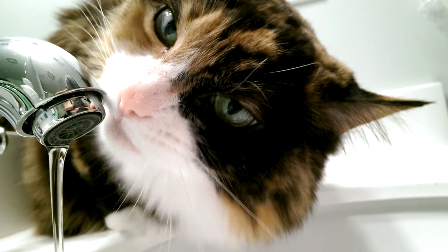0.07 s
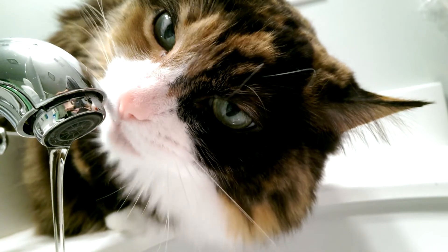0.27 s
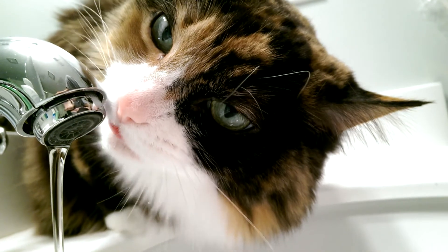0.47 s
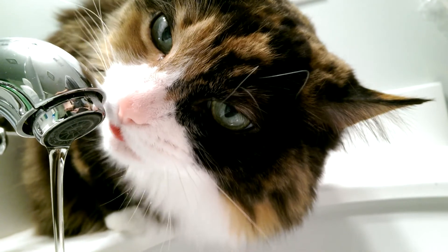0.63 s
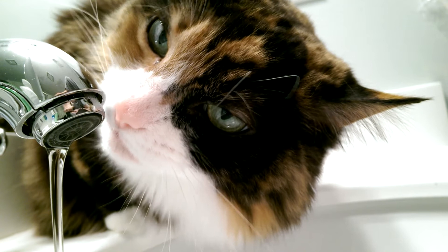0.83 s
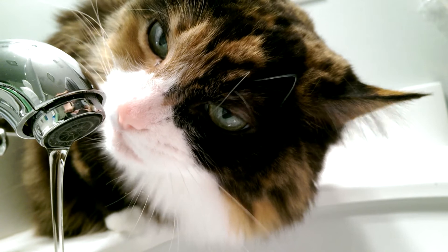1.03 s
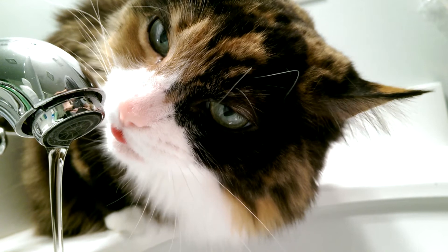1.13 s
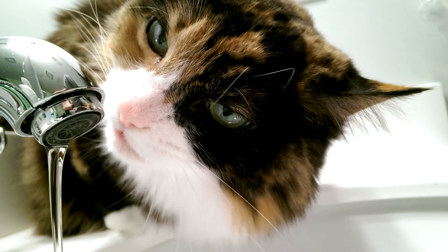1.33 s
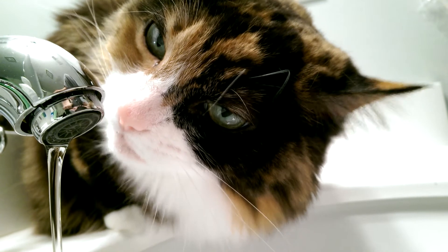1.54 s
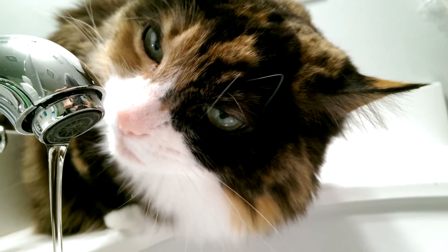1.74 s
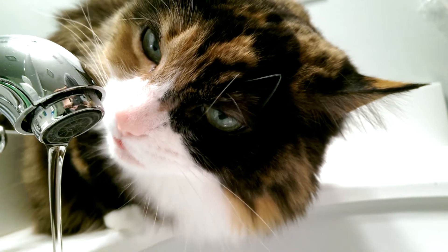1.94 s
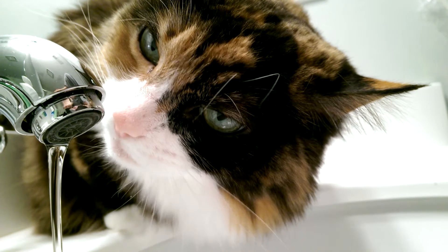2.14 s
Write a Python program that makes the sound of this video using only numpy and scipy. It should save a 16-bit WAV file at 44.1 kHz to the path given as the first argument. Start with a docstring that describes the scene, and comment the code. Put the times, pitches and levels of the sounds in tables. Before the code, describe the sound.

Close, wet lapping of a cat drinking from a softly running bathroom tap.

```python
"""Cat lapping at a bathroom tap

A cat laps a thin stream close to the microphones, four licks a second. Each lick is a wet crackle
of tearing water films that rings in the mouth; tongue clicks, gulps and bubbles fall between.
The stream patters softly in the basin over a low hollow drone. The tiled room adds a short tail."""
import sys
import numpy as np
from scipy import signal
from scipy.fft import rfft, irfft
from scipy.io import wavfile
from scipy.ndimage import uniform_filter1d, map_coordinates

SR = 44100
rng = np.random.default_rng(int(sys.argv[2]) if len(sys.argv) > 2 else 0)


def persist_wave(psi):
    """Save psi, clipped to +-1, as 16-bit WAV."""
    counts = np.round(np.clip(psi, -1, 1) * 32767).astype(np.int16)
    wavfile.write(sys.argv[1], SR, np.atleast_2d(counts).T)


N = 97020

# Treble shading of the left microphone. Each row: frequency in Hz, gain in dB.
LEFT_SHADE = [(200, -2), (1000, -1), (2000, -9.5), (3400, -8.5), (4350, -0.5), (5100, -11), (7000, -16.5),
              (15000, -13)]


def licks():
    """Water films tear on the tongue: crackle and froth swell, ring in the closing mouth, then pop."""
    # Each row: crest in seconds, lead-in in seconds, hold in seconds, level in dB, mouth ring in Hz,
    # relative fizz in dB, relative pop in dB.
    strokes = [(.256, 0.017, 0.0053, -38, 5130, 0, -3), (.5, 0.021, .022, -38, 4360, -14.5, 4),
               (0.732, 0.018, 0.012, -41, 4200, -12, 6), (0.78, .012, 0.0022, -48, 4000, -3, -8),
               (0.9804, .027, .001, -42.5, 4230, -3.5, 4.5), (1.2172, 0.019, 0.00079, -43, 4530, -7, 4.5),
               (1.445, 0.0082, 0.0012, -43, 4500, -22, 5.5), (1.684, 0.011, 0.004, -47, 4480, -9.5, 2.5),
               (1.9477, 0.016, .001, -47, 4480, -2.5, 10)]
    # Crackle and froth spectra. Each row: frequency in Hz, gain in dB.
    crackle_eq = [(200, -20), (1100, -18), (1900, -12.5), (2500, -8.5), (3700, 1), (4800, 6), (5900, 1.5),
                  (6800, -10.5), (15000, -18.5)]
    froth_eq = [(5000, 4), (7000, -6.5), (8700, 9.5), (10300, 6.5), (12500, 8), (15500, -8)]
    attack_s, release_s, pop_spread_s = .001, .005, .0022
    tears_per_s, ring_db = 2000, -5.5
    crackle, fizz, ring = np.zeros((3, N))
    t = np.arange(0, .08, 1 / SR)
    for crest_s, lead_s, hold_s, db, ring_hz, fizz_db, pop_db in strokes:
        start_s = crest_s - lead_s
        swell = amp(np.interp(t, [0, lead_s], [-6.5, 0]))
        release = np.exp(-np.maximum(t - lead_s - hold_s, 0) / release_s)
        envelope = swell * np.minimum(t / attack_s, 1) * release
        tears = amp(db) * burst(envelope, tears_per_s, spread_db=1.5)
        add(crackle, start_s, tears)
        foam = froth(len(t), per_s=6000, low_hz=5000, high_hz=13000, decay_cycles=2.5)
        add(fizz, start_s, amp(db + fizz_db) * envelope ** 2 * foam)
        # The mouth rings higher with the tongue out and sinks towards the pop.
        glide_hz = ring_hz * (1 + .1 * np.clip(1 - (t / lead_s) ** 2, 0, 1))
        mouth = resonate(tears, glide_hz, width_hz=1020)
        add(ring, start_s, amp(ring_db) * unit(mouth) * tears.std())
        pop = burst(np.exp(-.5 * ((t - lead_s) / pop_spread_s) ** 2), tears_per_s, spread_db=5)
        pop_ring = resonate(pop, ring_hz, width_hz=1600)
        add(ring, start_s, amp(db + pop_db) * unit(pop_ring) * pop.std())
    return colour(crackle, crackle_eq) + colour(fizz, froth_eq, keep_power=False) + ring


def squeak():
    """Air squeezed past the tongue in the longest lick; the whistle drops as the mouth opens."""
    # Whistle contour. Each row: time in seconds, pitch in Hz, level in dB.
    contour = [(0.498, 4350, -44), (0.511, 4376, -31), (0.528, 4303, -34), (.529, 3880, -39),
               (0.536, 3570, -42)]
    times_s, hz, db = np.transpose(contour)
    t = np.arange(N) / SR
    envelope = (t > times_s[0]) * (t < times_s[-1]) * amp(np.interp(t, times_s, db))
    flutter = 1 + .077 * unit(uniform_filter1d(rng.standard_normal(N), size=90))
    phase = 2 * np.pi * np.cumsum(np.interp(t, times_s, hz)) / SR
    return envelope * flutter * np.sin(phase)


def lip_smack():
    """A wet seal breaks in a few milliseconds."""
    # Smack spectrum. Each row: frequency in Hz, gain in dB.
    smack_eq = [(600, -39), (1900, -12), (3800, -8), (6800, -1), (8000, -5), (11900, -7), (12700, -13),
                (15500, -27)]
    start_s, db, rise_s, decay_s = .5991, -27.5, .002, .0015
    out, t = np.zeros(N), np.arange(0, .03, 1 / SR)
    envelope = np.minimum(t / rise_s, 1) ** .5 * np.exp(-np.maximum(t - rise_s, 0) / decay_s)
    snap = burst(envelope, per_s=11000, spread_db=-1)
    add(out, start_s, amp(db) * snap.std() * unit(colour(snap, smack_eq)))
    return out


def clicks():
    """Tongue and splashes make tiny clusters of wet ticks."""
    # Each row: start in seconds, level in dB, relative fizz in dB.
    clusters = [(0.144, -44, -8), (0.392, -50, -13), (0.412, -42, -10.5), (.441, -48, -17),
                (.474, -42, -24), (0.545, -54, 0), (0.6429, -44, -9), (0.69, -39, -19), (.759, -42.5, -1),
                (0.815, -49, 7), (0.918, -48.5, 0), (.995, -53.5, -4), (1.057, -48.5, -9),
                (1.256, -48.5, -9), (1.311, -49, -9), (1.337, -46, -11), (1.415, -42.5, -13),
                (1.484, -39.5, -9.5), (1.602, -48.5, -9), (1.616, -43, -9), (1.664, -42.5, -33),
                (1.789, -43.5, -21), (1.844, -46, -5), (1.904, -48, -24), (1.921, -45.5, -15),
                (1.989, -46, -2.5), (2.04, -47.5, -8), (2.125, -45.5, -1), (2.159, -45.5, -7.5)]
    # Body and fizz spectra. Each row: frequency in Hz, gain in dB.
    body_eq = [(300, -28.5), (1200, -13.5), (1900, -5), (2800, -7.5), (3800, -12), (5500, -4),
               (6800, -31.5), (15000, -43)]
    fizz_eq = [(2000, -48), (7000, 1), (8800, 5), (11700, 3.5), (16000, -11)]
    decay_s = .0035
    body, fizz = np.zeros((2, N))
    t = np.arange(0, .03, 1 / SR)
    for start_s, db, fizz_db in clusters:
        ticks = amp(db) * burst(np.exp(-t / decay_s), per_s=3300, spread_db=0)
        add(body, start_s, ticks)
        add(fizz, start_s, amp(fizz_db) * ticks)
    return colour(body, body_eq) + colour(fizz, fizz_eq)


def gulps():
    """Damped knocks of the mouth cavity as the jaw opens; lower throat thumps on swallowing."""
    # Each row: start in seconds, level in dB.
    jaw_knocks = [(0.5779, -44.5), (.916, -49), (1.147, -49.5), (1.382, -47.5), (1.624, -49.5)]
    # Each row: start in seconds, level in dB, pitch in Hz.
    swallows = [(.517, -53.5, 379), (0.74, -53, 328), (.863, -60, 470)]
    out = np.zeros(N)
    for start_s, db in jaw_knocks:
        add(out, start_s, ping(db, hz=994, decay_s=.00052))
    for start_s, db, hz in swallows:
        add(out, start_s, ping(db, hz, decay_s=.004))
    return out


def bubbles():
    """Each bubble rings briefly, rising a little in pitch."""
    # Each row: start in seconds, level in dB, pitch in Hz, decay in seconds.
    rings = [(.012, -37.5, 4800, 0.00045), (.113, -41.5, 2720, 0.0015), (0.134, -46, 2620, .0013),
             (.209, -41, 1980, 0.00086), (.223, -35.5, 2080, 0.00056), (0.262, -38.5, 1890, 0.00067),
             (.9528, -32, 4830, 0.00076), (1.006, -48, 1343, 0.0035), (1.394, -41.5, 5340, 0.0016),
             (1.507, -43.5, 2830, 0.0016), (1.511, -33.5, 5420, .0008), (1.536, -45, 5550, .001),
             (1.536, -38.5, 11700, 0.00028), (1.765, -33.5, 10600, 0.00014), (1.832, -41, 11500, 0.00044)]
    out = np.zeros(N)
    for start_s, db, hz, decay_s in rings:
        add(out, start_s, ping(db, hz, decay_s, rise_per_cycle=.005))
    return out


def froth(size, per_s, low_hz, high_hz, decay_cycles, count=30):
    """A swarm of tiny bubbles ringing at many pitches."""
    pitches_hz = np.geomspace(low_hz, high_hz, count) * rng.uniform(.97, 1.03, count)
    chance, strength = rng.random((2, count, size))
    hits = (chance < per_s / count / SR) * -np.log(strength)
    rings = [ping(0, hz, decay_cycles / hz) for hz in pitches_hz]
    return unit(sum(signal.oaconvolve(row, ring)[:size] for row, ring in zip(hits, rings)))


def trickle():
    """Drops patter in the basin in uneven clumps; the stream drives tiny bubbles under."""
    # Patter spectrum. Each row: frequency in Hz, gain in dB.
    basin_eq = [(300, -0.5), (900, -6.5), (1400, -5.5), (1900, 3.5), (3000, -3.5), (3800, 8.5),
                (4400, -11.5), (5500, 3.5), (6500, -6), (11700, -10), (14000, -14.5)]
    patter_db, fizz_db, clump_db = -61.5, -73, 3.5
    clumps = unit(uniform_filter1d(rng.standard_normal(N), size=500))
    drops = specks(N, per_s=2000, spread_db=1.5) * amp(clump_db * clumps)
    fizz = froth(N, per_s=170, low_hz=8300, high_hz=14100, decay_cycles=1.8)
    return amp(patter_db) * unit(colour(drops, basin_eq)) + amp(fizz_db) * fizz


def room(direct):
    """Dense reflections from tiles and basin, with a strong early cluster."""
    # Reflection spectrum. Each row: frequency in Hz, gain in dB.
    tile_eq = [(500, 7.5), (2000, 7.5), (3400, 2), (4200, -5.5), (4800, 3), (5700, 2), (6600, -4.5)]
    gap_s, early_s = .001, .0032
    hz, t, spectra = signal.stft(rng.standard_normal((2, SR // 2)), SR, nperseg=256)
    t60_s = at_hz([(2000, .16), (14000, .21)], hz)
    tail = signal.istft(spectra * amp(-60 * t / t60_s[:, None]), SR, nperseg=256)[1]
    age_s = np.arange(tail.shape[1]) / SR
    tail *= (age_s > gap_s) * (1 + 2.9 * np.exp(-age_s / early_s))
    send = np.array([colour(side, tile_eq, keep_power=False) for side in direct])
    return amp(-5.5) * signal.fftconvolve(send, tail / np.linalg.norm(tail[0]), axes=1)[:, :N]


def wash():
    """Diffuse water wash over a room rumble that both microphones share."""
    # Wash and rumble spectrum. Each row: frequency in Hz, gain in dB.
    wash_eq = [(20, 3), (80, 11), (190, 4), (350, -22.5), (520, -3), (1300, -5.5), (2000, -1.5),
               (3000, 2.5), (3800, -1.5), (5000, 0), (6500, -8.5), (11000, -11.5), (16000, -64)]
    db, shared_below_hz = -62.5, 760
    hz = np.fft.rfftfreq(N, 1 / SR)
    left, right = rfft(rng.standard_normal((2, N)))
    coherence = .92 / (1 + (hz / shared_below_hz) ** 6)
    left = coherence * right + np.sqrt(1 - coherence ** 2) * left
    left *= amp(.51 * at_hz(LEFT_SHADE, hz))
    return amp(db) * unit(irfft(np.array([left, right]) * amp(at_hz(wash_eq, hz)), N))


def drone():
    """A steady hollow drone, plus a low hum that dips briefly and later fades."""
    # Each row: centre in Hz, half-width in Hz, level in dB.
    resonances = [(76, 45, -72.5), (235.2, 13, -74.5), (272, 48, -72), (309.4, 19.7, -62)]
    hollow = sum(amp(db) * narrow_noise(hz, half_hz) for hz, half_hz, db in resonances)
    hum_db = np.interp(np.arange(N) / SR, [.3, .4, .46, 1.03, 1.15], [-67.5, -76, -63.5, -64, -78])
    hum = amp(hum_db) * narrow_noise(hz=123.7, half_width_hz=6.6)
    return (hollow + hum) * amp([[.9], [-.9]])  # slightly left


def amp(db):
    """Decibels to gain."""
    return 10 ** (np.asarray(db) / 20)


def unit(x):
    """Scale to rms 1."""
    return x / np.sqrt(np.mean(x ** 2) + 1e-20)


def at_hz(points, hz):
    """Interpolate a table on a log-frequency axis."""
    f, value = np.transpose(points)
    return np.interp(np.log(hz + 1), np.log(f), value)


def add(mix, start_s, sound):
    """Mix a sound in, in place."""
    part = mix[max(round(start_s * SR), 0):][:len(sound)]
    part += sound[:len(part)]


def colour(x, eq, keep_power=True, size=2048):
    """Minimum-phase filter with the given spectrum."""
    gain = amp(at_hz(eq, abs(np.fft.fftfreq(size, 1 / SR))))
    log_gain = np.log(unit(gain) if keep_power else gain)
    taps = np.fft.ifft(np.exp(np.conj(signal.hilbert(log_gain)))).real
    return signal.fftconvolve(x, taps[:size // 2])[:len(x)]


def resonate(x, hz, width_hz):
    """Double-pole resonance that follows a pitch curve."""
    carrier = np.exp(2j * np.pi * np.cumsum(hz * np.ones(len(x))) / SR)
    pole = np.exp(-np.pi * width_hz / SR)
    return (carrier * signal.lfilter([1], np.poly([pole, pole]), x / carrier)).real


def specks(size, per_s, spread_db):
    """Random impulses of uneven strength."""
    chance, strength, sign = rng.random((3, size))
    gain = amp(spread_db * np.minimum(-np.log(strength), 4))
    return unit((chance < per_s / SR) * np.sign(sign - .5) * gain)


def burst(envelope, per_s, spread_db):
    """Impulses under an envelope, with that envelope's energy."""
    impulses = specks(len(envelope), per_s, spread_db) * envelope
    return unit(impulses) * np.sqrt(np.mean(envelope ** 2))


def ping(db, hz, decay_s, rise_per_cycle=0):
    """Damped tone that swells for decay_s, then dies away."""
    t = np.arange(0, .06, 1 / SR)
    envelope = t / decay_s * np.exp(1 - t / decay_s)
    phase = 2 * np.pi * hz * t * (1 + rise_per_cycle * hz * t / 2)
    return amp(db) * envelope * np.sin(phase)


def narrow_noise(hz, half_width_hz):
    """Noise in one narrow resonance."""
    detuning = (np.fft.rfftfreq(N, 1 / SR) - hz) / half_width_hz
    return unit(irfft(rfft(rng.standard_normal(N)) / (1 + detuning ** 2), N))


def mic_pair(x, lead_s=.0005156):
    """A near sound reaches the left microphone first."""
    return np.array([map_coordinates(x, [np.arange(N) + lead_s * SR], order=3), x])


def scene():
    """Mouth and stream sit to one side of the microphones; the squeak has no echo."""
    near = licks() + lip_smack() + clicks() + bubbles() + trickle()
    # The stream falls below the microphones, so part of its patter arrives by different paths.
    left_patter = np.outer([1, 0], amp(-18.5) * trickle())
    direct = mic_pair(near) + gulps() + left_patter
    left, right = direct + room(direct) + mic_pair(squeak())
    return np.array([colour(left, LEFT_SHADE, keep_power=False), right]) + wash() + drone()


def record(dry):
    """The recorder's band limit."""
    edge_hz = 16150
    lowpass = signal.firwin(511, edge_hz, window=("kaiser", 9), fs=SR)
    return signal.oaconvolve(dry, lowpass[None], "same")


dry = scene()
out = record(dry)
persist_wave(out)
```